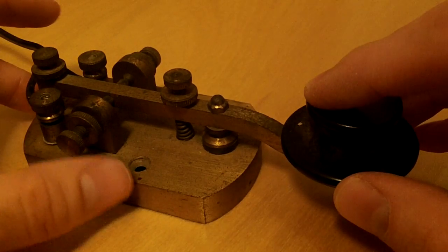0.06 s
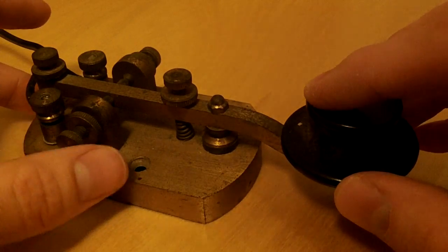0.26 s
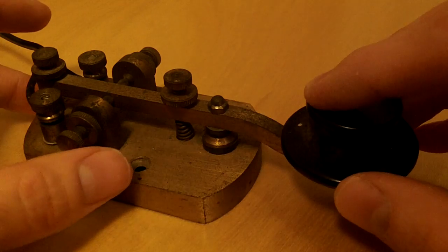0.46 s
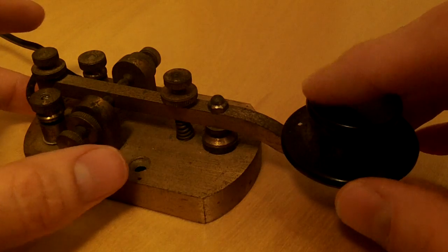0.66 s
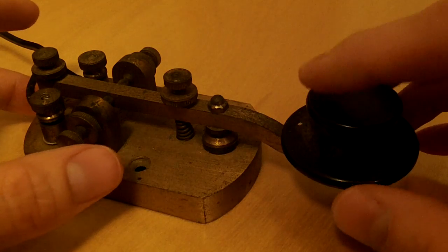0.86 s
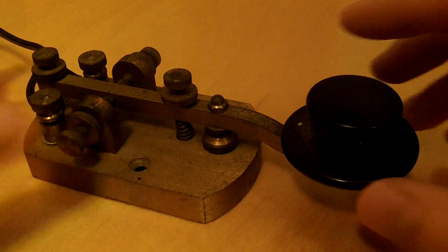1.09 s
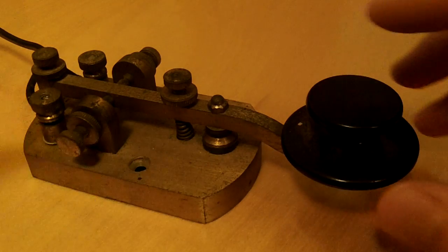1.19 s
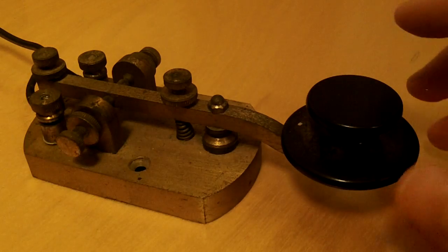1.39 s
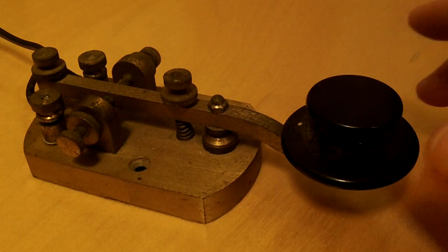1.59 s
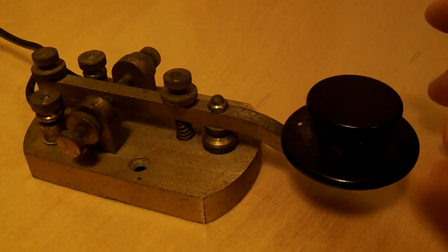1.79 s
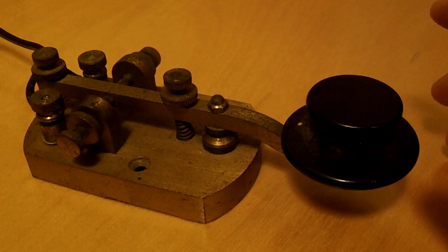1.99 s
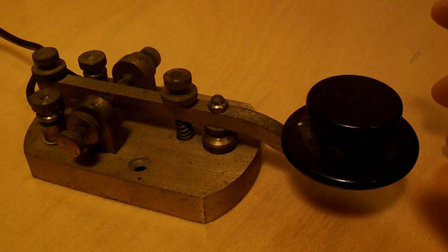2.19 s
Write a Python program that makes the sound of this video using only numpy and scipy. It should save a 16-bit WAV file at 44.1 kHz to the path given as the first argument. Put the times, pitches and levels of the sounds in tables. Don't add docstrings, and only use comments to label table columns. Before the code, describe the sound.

A brass telegraph key is tapped twice, sharp wooden-metallic clacks up close in a quiet room.

```python
import sys
import numpy as np
from scipy import signal
from scipy.fft import rfft, irfft
from scipy.io import wavfile
from scipy.ndimage import uniform_filter1d

SR = 44100
rng = np.random.default_rng(int(sys.argv[2]) if len(sys.argv) > 2 else 0)


def makeup_ratio(level_db):
    decades = np.asarray(level_db, float) / 20
    return 10 ** decades


def int16_out(signal):
    q = np.round(np.clip(np.atleast_2d(signal).T, -1, 1) * 32767)
    wavfile.write(sys.argv[1], SR, q.astype(np.int16))


N = 99225
BUZZ_HZ = 11853.5


def evened(x):
    return x / np.sqrt(np.mean(x ** 2) + 1e-20)


def read(points, hz):
    f, value = np.transpose(points)
    return np.interp(np.log(hz + 1), np.log(f + 1), value)


def add(mix, s, sound):
    part = mix[round(s * SR):][:len(sound)]
    part += sound[:len(part)]


def ring(modes, pitch=1):
    hz, db, t60 = np.transpose(modes)[:, :, None]
    t = np.arange(SR // 2) / SR
    partials = makeup_ratio(db - 60 * t / t60) * np.sin(2 * np.pi * hz * pitch * t)
    return partials.sum(0)


# [f/Hz, level/dB, t60/s]
LEVER_MODES = [(1215, -12, 0.024), (1320, -4, 0.017), (1428, -11, 0.031), (1729, -1.5, 0.05),
               (1900, -12, 0.03), (2020, -30, 0.12), (3342, -8.5, 0.012)]
# [f/Hz, level/dB, t60/s]
BASE_MODES = [(411, -14.5, 0.13), (482.4, -4.5, 0.039), (561, -14.5, 0.12), (655, -14, 0.073),
              (743, -17.5, 0.078), (813, 0, 0.027), (988, -21, 0.093)]
# [f/Hz, level/dB, t60/s]
TABLE_MODES = [(85.5, -24, 0.49), (146.6, -1.5, 0.084), (184, -1.5, 0.037), (247, -12.5, 0.08),
               (319.5, -14, 0.27)]
# [f/Hz, level/dB, t60/s]
SCREW_MODES = [(2254, -20, 0.03), (2565, -3.5, 0.01), (2450, -3, 0.026), (2977, -18, 0.022),
               (4030, -32, 0.055), (4188, -15, 0.075), (4535, -9.5, 0.012), (4500, -25.5, 0.036),
               (6270, -23.5, 0.019), (6790, -21.5, .015)]
CHATTER_S = [0, .00272, .0050, .0068, .0105]
CHATTER_DB = [-3, -1.6, -4.5, -8, -8.5]


def press():
    t = np.arange(SR // 2) / SR
    rattle_band = signal.butter(2, [600, 5000], "band", fs=SR)
    rattle = signal.lfilter(*rattle_band, rng.standard_normal(len(t)))
    crack = makeup_ratio(-23 - 60 * t / 0.013) * rattle
    body = ring(BASE_MODES) + ring(LEVER_MODES) - ring(TABLE_MODES) - ring(SCREW_MODES) + crack
    out = np.zeros(len(t))
    for delay, db in zip(CHATTER_S, CHATTER_DB):
        add(out, delay, makeup_ratio(db) * body)
    return makeup_ratio(-3) * out / abs(out).max()


def swell(blow):
    rise_s = 0.0045
    noise = signal.oaconvolve(rng.standard_normal(1500), blow[:300])[300:1400]
    return evened(noise) * np.exp((np.arange(1100) - 1100) / SR / rise_s)


# [f/Hz, level/dB, t60/s]
THUD_MODES = [(115.4, 6, 0.06), (178, 10.5, 0.024), (463, -6.5, 0.083)]


def release(modes, db, thud_s, thud_db, thud_pitch):
    rise_s, again_s, again_db, dull_db = 0.0022, 0.0076, -7, -16
    t = np.arange(SR // 2) / SR
    knock = ring(modes) * (1 - np.exp(-(t / rise_s) ** 2))
    dull = [(hz, level + dull_db * np.log2(hz / 1200) ** 2, t60) for hz, level, t60 in modes]
    add(knock, again_s, makeup_ratio(again_db) * ring(dull))
    out = makeup_ratio(db) * knock
    thud = signal.oaconvolve(ring(THUD_MODES, thud_pitch), np.hanning(40) / 20)
    add(out, thud_s, makeup_ratio(thud_db) * thud)
    return out


# [f/Hz, t60/s]
ROOM_DECAY = [(100, 0.43), (200, 0.16), (350, 0.39), (800, 0.2), (2000, 0.15), (5000, 0.17)]


def room(x):
    taps = np.zeros(SR // 2)
    at = np.arange(120, SR // 2 - 20, 20)
    taps[at + rng.integers(0, 20, len(at))] = rng.choice([-1., 1.], len(at))
    hz, t, z = signal.stft(taps, SR, nperseg=256)
    decay = makeup_ratio(-60 * t / read(ROOM_DECAY, hz)[:, None])
    tail = signal.istft(z * decay, SR, nperseg=256)[1]
    return signal.fftconvolve(x, tail / np.linalg.norm(tail))[:N]


# [f/Hz, level/dB per Hz]
FLOOR_SPECTRUM = [(20, -9), (60, 2), (91, -12.5), (125, -6.5), (420, -11), (2000, -15), (5000, -18.5),
                  (12000, -21.5)]


def floor():
    floor_db, patch_db, hum_hz, hum_db = -55, 1.0, 59.3, -71
    frames, hz = N // 512 + 5, np.fft.rfftfreq(2048, 1 / SR)
    a, b, patches = rng.standard_normal((frames, 1025, 3)).T
    patches = uniform_filter1d(patches, 20, 0)
    patches = evened(uniform_filter1d(patches, 6, 1))
    z = (a + 1j * b) * makeup_ratio(read(FLOOR_SPECTRUM, hz)[:, None] + patch_db * patches)
    noise = signal.istft(z, nperseg=2048, noverlap=1536)[1][:N]
    hum = np.sqrt(2) * np.sin(2 * np.pi * hum_hz * np.arange(N) / SR)
    return makeup_ratio(floor_db) * evened(noise) + makeup_ratio(hum_db) * hum


def buzz():
    step_hz, peak_hz, spread_hz = 29.98, 258, 155
    off = (np.arange(-16, 16)[:, None] + .5) * step_hz
    size = makeup_ratio(-85) * np.exp(-((abs(off) - peak_hz) / spread_hz) ** 2)
    turns = (BUZZ_HZ + off) * np.arange(N) / SR + rng.random(off.shape)
    return np.sqrt(2) * (size * np.sin(2 * np.pi * turns)).sum(0)


# [t/s, level/dB, swell ahead/dB]
PRESSES = [
    (.2006, -11, -31),
    (.44265, -11, -39),
]
# [t/s, level/dB, base thud delay/s, thud level/dB, thud pitch factor]
RELEASES = [
    (.005, -44.5, 0.0073, -50.5, 1.16),
    (0.2954, -40.5, 0.0083, -45, 1.5),
    (.559, -35, 0.0077, -45, 1.0),
    (1.673, -47, 0.0045, -74, 2.16),
]
# [f/Hz, level/dB, t60/s]
STOP_MODES = [
    [(891, 0, 0.037), (1180, 6.5, 0.017), (1786, 3, .035), (2200, -12, .03), (2990, -3.5, .03)],
    [(884, 4.5, 0.022), (1250, -2.5, 0.039), (1814, -4, .045), (2260, 1.5, 0.02), (3105, 0, 0.037)],
    [(930, -11.5, 0.028), (1210, -5.5, 0.04), (1779, 4.5, 0.028), (2280, -31, .03), (3060, -25, 0.036)],
    [(503, -3, .015), (905, 2.5, 0.0099), (1220, -1, .015), (1800, 2, 0.013), (2200, -3, .015)],
]


def scene():
    key, ahead, blow = np.zeros(N), np.zeros(N), press()
    for s, db, swell_db in PRESSES:
        add(key, s, makeup_ratio(db) * blow)
        add(ahead, s - 1100 / SR, makeup_ratio(swell_db) * swell(blow))
    for (s, *settings), modes in zip(RELEASES, STOP_MODES):
        add(key, s, release(modes, *settings))
    mic_low_cut = signal.butter(3, 93, "high", fs=SR)
    key = signal.lfilter(*mic_low_cut, key)
    return (key + ahead + makeup_ratio(-13) * room(key) + floor() + buzz())[None]


def top_cut(x):
    return signal.sosfilt(signal.butter(12, 16520, fs=SR, output="sos"), x)


def record(dry):
    port_hz, dip_width_hz, hole_width_hz, slit_width_hz, edge_hz = 7874, 1040, 150, 40, 15290
    hz = np.fft.rfftfreq(N, 1 / SR)
    off = abs(hz - port_hz)
    dip = 0.16 + 0.94 * off ** 2 / (off ** 2 + dip_width_hz ** 2)
    hole = 1 / (1 + (hole_width_hz / (off + 1)) ** 12)
    slit = 1 - .9 * np.exp(-((hz - BUZZ_HZ) / slit_width_hz) ** 2)
    response = dip * hole * slit * (hz < edge_hz)
    mix = irfft(rfft(dry, axis=1) * response, N, axis=1)
    return top_cut(mix)


dry = scene()
out = record(dry)
int16_out(out)
```